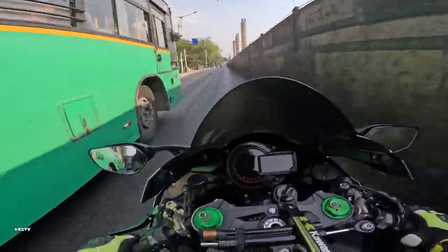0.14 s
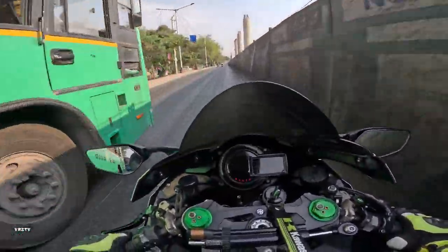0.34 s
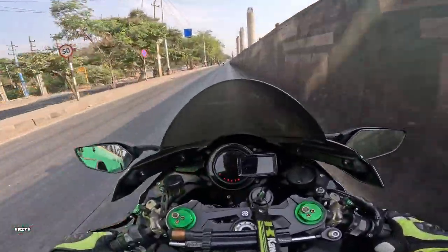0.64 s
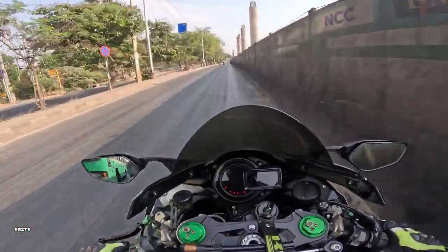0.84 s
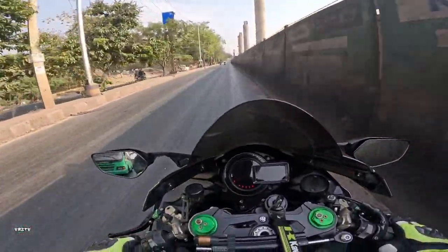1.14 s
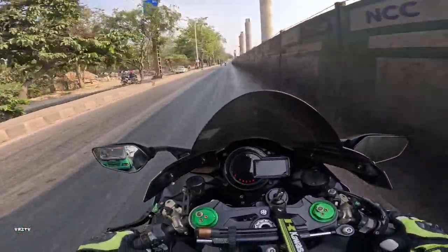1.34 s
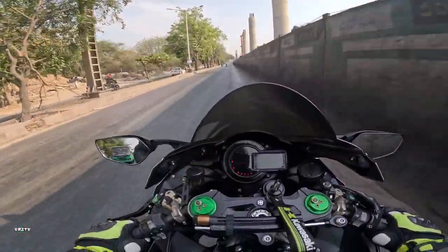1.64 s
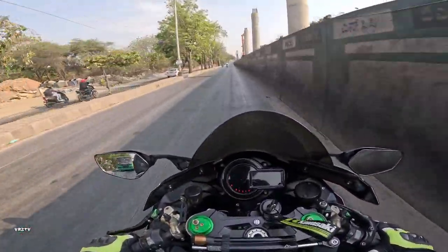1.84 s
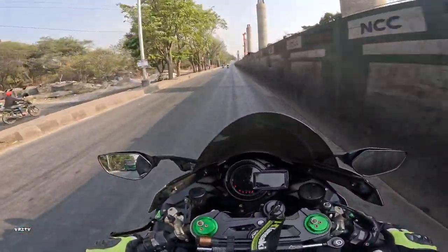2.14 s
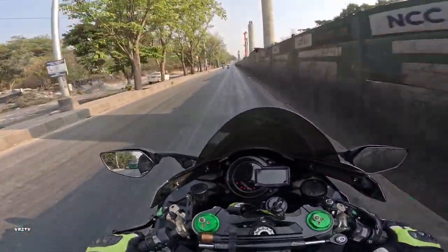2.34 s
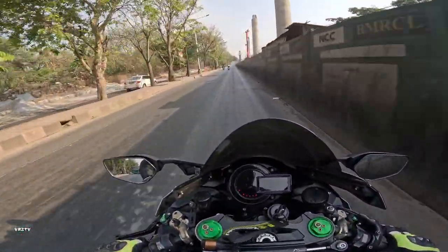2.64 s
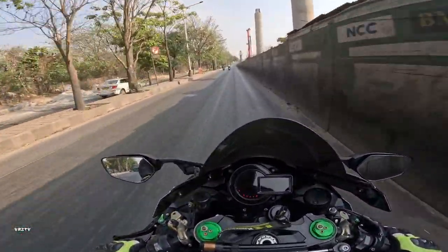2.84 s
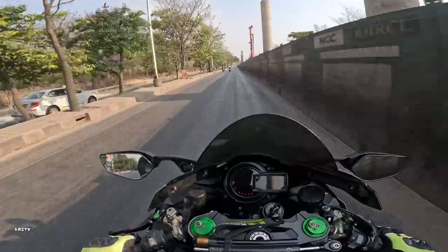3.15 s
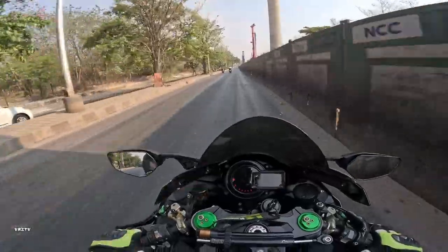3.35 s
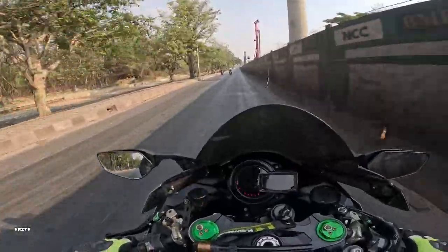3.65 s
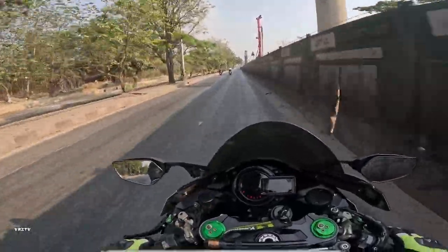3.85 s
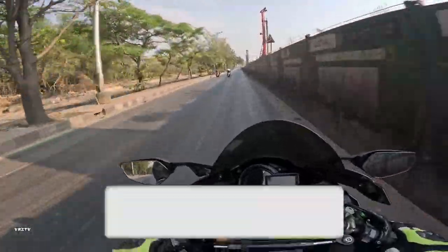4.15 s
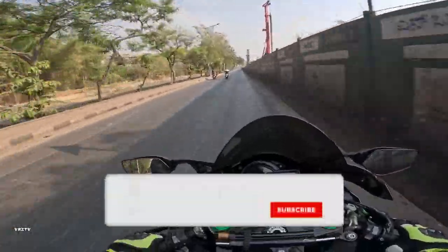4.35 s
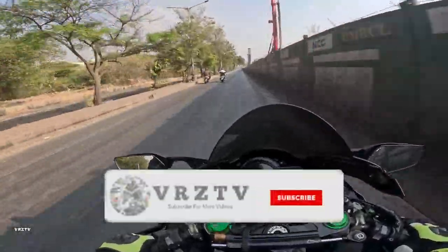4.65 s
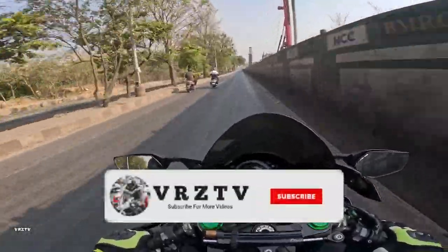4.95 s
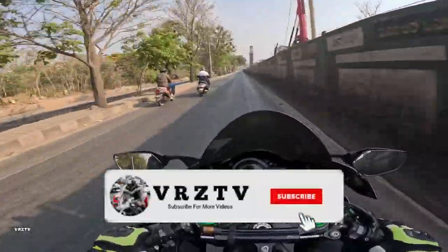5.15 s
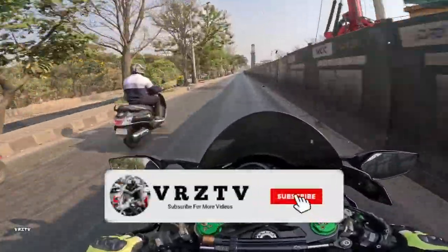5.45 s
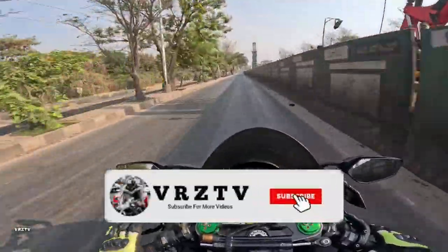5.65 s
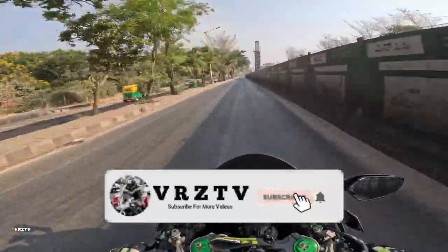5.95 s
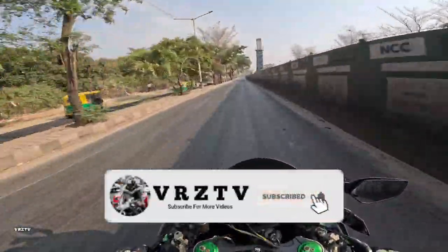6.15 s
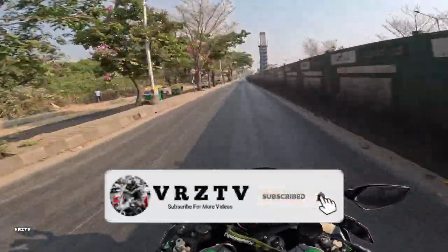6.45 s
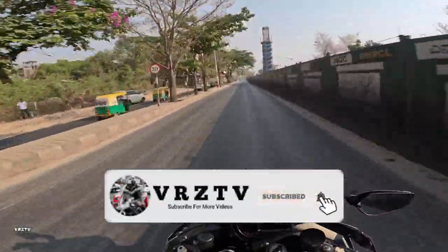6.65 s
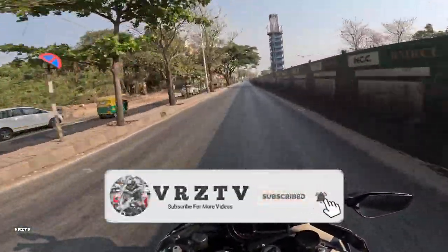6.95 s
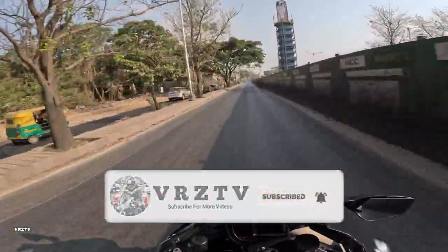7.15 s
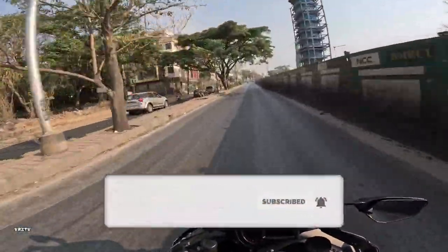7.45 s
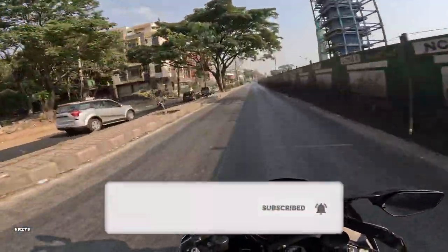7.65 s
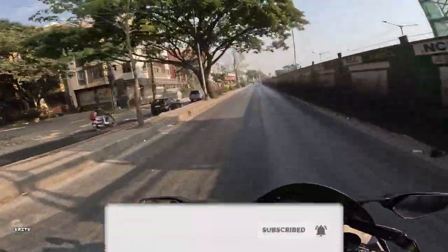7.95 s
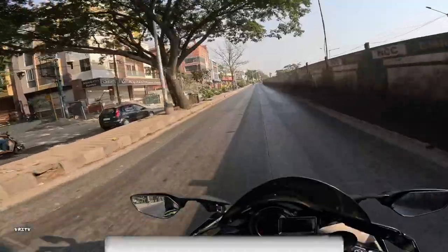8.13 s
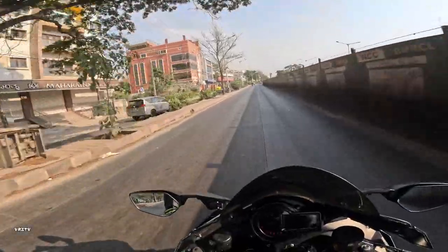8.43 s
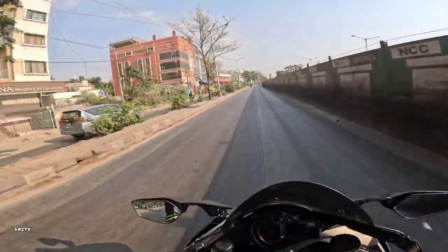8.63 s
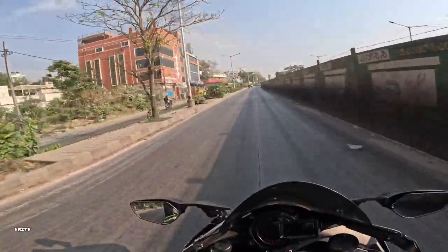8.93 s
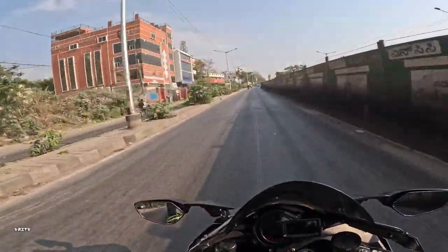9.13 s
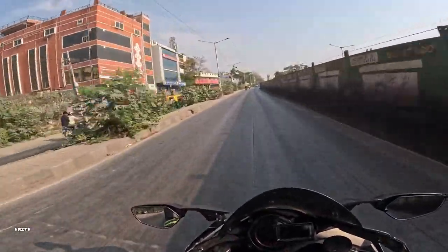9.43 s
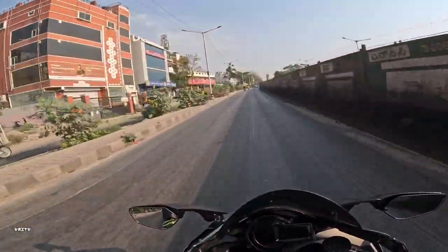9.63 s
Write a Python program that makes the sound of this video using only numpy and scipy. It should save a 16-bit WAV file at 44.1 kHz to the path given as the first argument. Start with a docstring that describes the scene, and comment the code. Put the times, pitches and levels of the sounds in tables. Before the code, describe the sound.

Close onboard sound of a powerful motorcycle on an open road along a hard wall. The engine rises through successive gears, swelling and hollowing with wall reflections, with raspy intake snarl and short exhaust pops at the shifts. A deep puff of bus wake passes early. Then the throttle shuts, leaving a soft falling hum beneath increasingly heavy wind roar and hiss.

```python
"""A climbing exhaust note is heard first: a four-cylinder sports motorcycle pulls hard, from the rider's seat.
The firing pulses sound as pipe multiples that swell and cancel against their echo off a wall.
Intake strokes ring the airbox into a snarl; three quick upshifts cut the firing and end in pops of unburnt fuel.
The fourth gear holds nearly level until the throttle closes, and the engine sinks to a drone of a few pipe lines.
Wind, as shaped noise, buffets and hisses at the microphone throughout."""
import sys
import numpy as np
from scipy import signal
from scipy.fft import rfft, irfft
from scipy.io import wavfile
from scipy.ndimage import uniform_filter1d, minimum_filter1d

SR = 44100
rng = np.random.default_rng(int(sys.argv[2]) if len(sys.argv) > 2 else 0)


def unload_wav(signal):
    """Save mono or channel-first audio to the path in sys.argv[1] as 16-bit WAV at rate SR, clipped to [-1, 1]."""
    wavfile.write(
        sys.argv[1],
        SR,
        np.round(np.clip(np.atleast_2d(signal).T, -1, 1) * 32767).astype(np.int16),
    )


N = 431738
TIME = np.arange(N) / SR
BINS = np.fft.rfftfreq(N, 1 / SR)

# Air at the microphone, before gusts: (time [s], buffeting level [dB], hiss level [dB])
WIND_LEVELS = [(0, -22, -58), (.45, -20, -50.5), (.8, -24, -57), (1.4, -23, -54), (2.2, -23.5, -54.5),
               (3.3, -19, -48.5), (3.7, -21, -58.5), (4.5, -19, -47), (5.5, -18, -50), (5.95, -16, -41),
               (6.9, -16, -37.5), (8.5, -16, -40), (9.79, -15, -38.5)]
# Spectrum of the buffeting: (frequency [Hz], level [dB])
BUFFET_SPECTRUM = [(15, -7.5), (45, -2.5), (120, 2.5), (220, 2.5), (400, -1), (560, -5.5), (850, -7),
                   (1350, -16.5), (2400, -20), (3300, -30), (5000, -39), (8000, -50), (15000, -58.5)]
# Spectrum of the wind hiss: (frequency [Hz], level [dB])
HISS_SPECTRUM = [(1500, -16), (3800, 3), (5300, 0.5), (6300, -4), (8200, -3.5), (9000, -8), (9800, -7),
                 (10800, -9), (11800, -9), (13000, -12), (15500, -17.5)]
# Thin whistles of the wind at edges: (frequency [Hz], width [Hz], lift of the hiss [dB])
EDGE_WHISTLES = [(5600, 250, 0), (6860, 200, 2), (7660, 200, 4)]
# Wake of a bus just overtaken, pushing on the microphone: (time [s], level [dB])
WAKE_LEVEL = [(0, -58), (.6, -49), (.8, -30), (1.3, -35), (1.5, -69)]
# Whine of the crank's drive gear, before flicker: (time [s], level [dB])
GEAR_LEVEL = [(0.1, -70), (.3, -57), (.75, -60), (.9, -80)]
# One pull in each gear, the speed being the firing rate at two firings a crank turn:
# (firing starts [s], firing stops [s], from [Hz], to [Hz], bow of the pull's course [Hz],
#  flare while the clutch bites [Hz], body of the exhaust [dB], intake [dB])
GEAR_PULLS = [(0, 1.725, 148.5, 249, 0, 0, 0, 0), (1.799, 3.393, 199, 252, 1, 17, -2, 0),
              (3.476, 5.254, 215, 250, 2, 4, -.5, .7), (5.337, 5.78, 223, 222, 0, 0, -7, 0)]
# Lumpy beat of unequal cylinders: (firing rate [Hz], level pulling [dB], level coasting [dB])
BEAT_LEVELS = [(153, -24, -21), (167.6, -20.5, -24.5), (179.7, -19.5, -27), (193.4, -38, -34.5),
               (215, -33, -31), (245, -35.5, -39)]
# Resonances that colour the beat: (frequency [Hz], level [dB])
LOPE_SPECTRUM = [(80, -5), (200, -13.5), (280, -21), (350, 3.5), (430, 6), (540, -16), (800, -3.5),
                 (1080, -9), (1400, -24.5)]
# Resonances of the airbox: (frequency [Hz], level [dB])
SNARL_SPECTRUM = [(600, -11), (850, 11), (1100, 5), (1280, -3.5), (1450, 4.5), (1750, 2.5), (2100, -2),
                  (2400, -3), (2850, -3.5), (3200, -18), (4200, -18.5), (6000, -27.5)]
# Spectrum of air rasping past the throttle: (frequency [Hz], level [dB])
RASP_SPECTRUM = [(150, -23), (400, -2.5), (620, 3), (830, 9.5), (1300, -12), (1800, 0), (2300, 0),
                 (2800, -0.5), (3200, -8), (4200, -14), (6500, -20), (9000, -21), (12300, -33),
                 (14000, -35), (15500, -37.5)]
# Nasal lift of the airbox's main resonance: (time [s], lift [dB])
HONK_LIFT = [(.5, -5), (1.6, -1.5), (3.95, -6.5), (4.35, 4.5), (4.75, 4), (5.2, -1), (5.7, -3)]
# Drone with the throttle closed:
# (firing rate [Hz], level of 1 [dB], 1.5 [dB] and 2 [dB] times that rate)
DRONE_LINES = [(164.6, -29, -22, -22.5), (175.8, -17, -25.5, -15.5), (187, -15.5, -27, -15.5),
               (189.4, -13, -21.5, -16.5), (200.5, -13, -30, -27), (208.3, -12.5, -23.5, -35),
               (213, -13, -27.5, -21), (218, -14, -29, -27.5)]
# Exhaust pops around the shifts: (time [s], level [dB])
EXHAUST_POPS = [(1.798, -6), (1.807, -7), (3.387, -6), (3.461, -1), (3.467, -6), (5.329, -1), (5.346, -9)]
# Pipe resonances favouring each multiple of the firing rate:
# (firing rate [Hz], level of the 1st [dB], 2nd [dB], 3rd [dB] and 4th multiple [dB])
PIPE_RESONANCES = [(155, -23.5, -18.5, -18, -34), (175, -14, -12.5, -34, -21),
                   (190, -12.5, -15.5, -30, -39.5), (207.6, -15.5, -15.5, -31.5, -23),
                   (229.2, -12.5, -10.5, -28, -24.5), (247.4, -15.5, -21.5, -24, -26)]
# The bike weaves beside a wall: (time [s], distance [m])
WALL_DISTANCE = [(0, 2.62), (.54, 2.23), (.72, 2.26), (1.06, 1.94), (1.71, 1.55), (2.19, 1.743),
                 (2.42, 1.66), (2.58, 1.755), (3.04, 1.65), (3.18, 1.76), (3.59, 1.82), (4.8, 1.61),
                 (5.21, 1.605), (5.44, 1.92), (5.56, 1.85), (5.7, 1.65)]

SOUND_M_PER_S, WALL_ECHO_GAIN = 343, 0.81
FLARE_S = .075
SAG_HZ_PER_S = 14.3
THROTTLE_CLOSE_S, DRONE_AFTER_S, DRONE_RISE_S = 0.15, 0.11, 0.054
FULL_BREATH_HZ = 245.5  # under throttle the intake stops growing at this firing rate
# Intake under throttle, before bite and gear: top level (dB), growth (dB per Hz), least level (dB)
SNARL_GROWTH, RASP_GROWTH = (-27, 0.45, -36.5), (-29, 0.51, -43.5)
SHUT_SNARL_DB, SHUT_RASP_DB, SHUT_DB_PER_HZ = -49, -30.5, 0.092  # levels at FULL_BREATH_HZ
BAND_LIMIT_HZ = 15750

PULL_TIMES = [s for pull in GEAR_PULLS for s in pull[:2]]
THROTTLE_SHUTS_S = GEAR_PULLS[-1][1]


def amp(db):
    """A level in decibels is the logarithm of an amplitude ratio."""
    return 10 ** (np.asarray(db) / 20)


def unit(x):
    """Normalization to a root-mean-square value of one."""
    return x / np.sqrt(np.mean(x ** 2) + 1e-20)


def curves(rows):
    """Linear interpolation of each column of a time table, one value for each sample."""
    s, *columns = np.transpose(rows)
    return [np.interp(TIME, s, column) for column in columns]


def spectrum_db(points, hz):
    """Interpolation of a spectrum in dB along a logarithmic frequency axis."""
    f, db = np.transpose(points)
    return np.interp(np.log(hz + 1), np.log(f), db)


def coloured(x, db):
    """Linear filtering multiplies each frequency bin by a gain in dB; the result has an rms of one."""
    return unit(irfft(rfft(x) * amp(db), N))


def wander(rate_hz):
    """Low-passed noise is a smooth random process; this one varies up to the given rate, with an rms of one."""
    count = 8192
    hz = np.fft.rfftfreq(count, N / SR / count)
    slow = irfft(rfft(rng.standard_normal(count)) / (1 + (hz / rate_hz) ** 4))
    return unit(np.interp(TIME, np.linspace(0, N / SR, count), slow))


def bell(hz, centre_hz, width_hz):
    """A resonance responds most, here by one, at its centre and less to either side."""
    return 1 / (1 + (2 * (hz - centre_hz) / width_hz) ** 2)


def wind(gust_db=1.0, eddy_db=0.57, hiss_gust_db=0.3, hiss_eddy_db=0.73,
         split_hz=200, roar_growth=0.57, full_db=-17):
    """Turbulence: eddies off the windscreen thump the microphone, and the hiss flutters with them."""
    buffet_db, hiss_db = curves(WIND_LEVELS)
    gusts, eddies = wander(22), wander(87)

    air = coloured(rng.standard_normal(N), spectrum_db(BUFFET_SPECTRUM, BINS))
    low_pass = signal.butter(2, split_hz, fs=SR, output="sos")
    rumble = signal.sosfiltfilt(low_pass, air)
    roar_gain = amp(roar_growth * (buffet_db - full_db))  # stronger wind is brighter
    buffet = rumble + (air - rumble) * roar_gain

    whistles_db = sum(db * bell(BINS, hz, width) for hz, width, db in EDGE_WHISTLES)
    hiss = coloured(rng.standard_normal(N), spectrum_db(HISS_SPECTRUM, BINS) + whistles_db)
    return (buffet * amp(buffet_db + gust_db * gusts + eddy_db * eddies)
            + hiss * amp(hiss_db + hiss_gust_db * gusts + hiss_eddy_db * eddies))


def wake(centre_hz=45, width_hz=55):
    """Large eddies turn over slowly, so their pressure on the microphone is a deep rumble."""
    rumble = coloured(rng.standard_normal(N), 20 * np.log10(bell(BINS, centre_hz, width_hz)))
    return amp(curves(WAKE_LEVEL)[0]) * rumble


def roadside(x, wall_s=0.0084, t60=0.16, wet_db=-17):
    """Diffuse reflection: the wall and things farther off scatter the engine back as a decaying tail."""
    t = TIME[:SR // 4]
    taps = rng.standard_normal(len(t)) * (t > wall_s) * amp(-60 * t / t60)
    high_pass = signal.butter(2, 600, "high", fs=SR, output="sos")
    scattered = signal.sosfilt(high_pass, x)
    return amp(wet_db) * signal.fftconvolve(scattered, taps / np.linalg.norm(taps))[:N]


def by_speed(rows, hz):
    """Linear interpolation of each column of a speed table at the engine's firing rate."""
    speeds, *columns = np.transpose(rows)
    return [np.interp(hz, speeds, column) for column in columns]


def per_gear(values):
    """A step function: one value for each pull, held while it lasts and ramped between pulls."""
    return np.interp(TIME, PULL_TIMES, np.repeat(values, 2))


def speed():
    """The firing rate climbs in the first three gears and holds nearly level in the fourth; then drag sinks it."""
    hz = np.interp(TIME, PULL_TIMES, [f for pull in GEAR_PULLS for f in pull[2:4]])  # shifts drop the rate
    for start, stop, _, _, bow_hz, flare_hz, *_ in GEAR_PULLS:
        progress = np.clip((TIME - start) / (stop - start), 0, 1)
        since = (TIME - start) / FLARE_S
        flare = np.clip(1 + since, 0, 1) * np.exp(-since ** 4)
        hz = hz + 4 * bow_hz * progress * (1 - progress) + flare_hz * flare
    return hz - SAG_HZ_PER_S * np.maximum(TIME - THROTTLE_SHUTS_S, 0)


def throttle():
    """A valve on the air supply: one while open, sinking to zero around the end of the last pull."""
    return np.clip((THROTTLE_SHUTS_S - TIME) / THROTTLE_CLOSE_S + .5, 0, 1)


def ignition(fade_s=0.0084):
    """Combustion gate: one while the cylinders fire, zero during each upshift."""
    cut = 0
    for before, after in zip(GEAR_PULLS, GEAR_PULLS[1:]):
        inside_s = np.minimum(TIME - before[1], after[0] - TIME)
        cut = cut + np.clip(inside_s / fade_s + .5, 0, 1)
    return 1 - cut


def gear(angle):
    """Tooth meshing: each turn of the crank gear gives one cycle of thin, unsteady whine for every tooth."""
    teeth, shake_rad, flicker_db = 49, 1.2, 4
    level = amp(curves(GEAR_LEVEL)[0] + flicker_db * wander(11))
    return level * np.sqrt(2) * np.cos(teeth * angle / 2 + shake_rad * wander(45))


def stack(angle, hz, multiples, colour, unrest, rate_hz, lift=lambda hz: 0, smear=0.1313):
    """Multiples of the firing rate sweep through fixed resonances that smear each pulse; rms one before lift."""
    sound, power = np.zeros(N), np.zeros(N)
    for k in multiples:
        gain = amp(spectrum_db(colour, k * hz))
        phase = k * angle - smear * k ** 2
        steady = np.cos(phase)
        restless = unrest * wander(rate_hz) * np.cos(phase + 2 * np.pi * rng.random())
        sound += gain * amp(lift(k * hz)) * (steady + restless)
        power += gain ** 2 * (1 + unrest ** 2) / 2
    return sound / np.sqrt(power)


def lope(angle, hz, cycle_db=-8):
    """Subharmonics: unequal cylinders repeat each turn and each four-stroke cycle, adding lines between."""
    per_turn = stack(angle, hz, np.arange(.5, 7), LOPE_SPECTRUM, unrest=.4, rate_hz=12)
    per_cycle = stack(angle, hz, np.arange(.75, 5, .5), LOPE_SPECTRUM, unrest=.7, rate_hz=12)
    pulling_db, coasting_db = by_speed(BEAT_LEVELS, hz)
    level_db = coasting_db + throttle() * (pulling_db - coasting_db)
    return amp(level_db) * (per_turn + amp(cycle_db) * per_cycle)


def intake_level(hz, growth, shut_db, bite_db=7, bite_s=0.055):
    """Air flow grows with speed under throttle, with a short extra bite as each new gear takes up the load."""
    top_db, db_per_hz, least_db = growth
    bite = 0
    for start, *_ in GEAR_PULLS[1:]:
        bite = bite + (TIME > start - FLARE_S) * np.exp(-((TIME - start) / bite_s) ** 2)
    grown = amp(top_db + db_per_hz * np.minimum(hz - FULL_BREATH_HZ, 0))
    gear_db = per_gear([pull[-1] for pull in GEAR_PULLS])
    pulling = np.hypot(grown, amp(least_db)) * amp(bite_db * bite + gear_db)
    coasting = amp(shut_db + SHUT_DB_PER_HZ * (hz - FULL_BREATH_HZ))
    return coasting + throttle() * (pulling - coasting)


def intake(angle, hz, gulp=0.35, honk_hz=1700, honk_width_hz=550):
    """Forced resonance: each intake stroke rings the airbox and drags a puff of rasping air past the throttle."""
    honk_db, = curves(HONK_LIFT)
    uneven, jitter_rad = .16, .03

    def honk(f):
        """The airbox's main resonance lifts or lowers the multiples that pass near it."""
        return honk_db * bell(f, honk_hz, honk_width_hz)

    strokes = angle + jitter_rad * wander(25)  # uneven timing thickens the highest lines most
    snarl = stack(strokes, hz, np.arange(5, 27), SNARL_SPECTRUM, unrest=.25, rate_hz=10, lift=honk)
    snarl *= 1 + uneven * (np.cos(angle / 2) + np.sin(angle / 4))  # the four cylinders draw unequally

    puffs = rng.standard_normal(N) * np.exp(gulp * np.cos(angle) + uneven * np.cos(angle / 2))
    rasp = coloured(puffs, spectrum_db(RASP_SPECTRUM, BINS))
    return (intake_level(hz, SNARL_GROWTH, SHUT_SNARL_DB) * snarl
            + intake_level(hz, RASP_GROWTH, SHUT_RASP_DB) * rasp)


def pops(pipe_hz=260):
    """Explosive excitation: unburnt fuel goes off in the pipe, a short heavy swing with a dull crack on top."""
    ring_s, crack, dull_hz = .0018, .3, 2200
    out, t = np.zeros(N), TIME[:SR // 20]
    dulling_db = 10 * np.log10(1 + (BINS / dull_hz) ** 2)
    grit = coloured(rng.standard_normal(N), spectrum_db(RASP_SPECTRUM, BINS) - dulling_db)
    swell = t / ring_s * np.exp(1 - t / ring_s)
    for s, db in EXHAUST_POPS:
        at = round(s * SR) + np.arange(len(t))
        out[at] += amp(db) * swell * (np.sin(2 * np.pi * pipe_hz * t) + crack * grit[at])
    return out


def pipe_delay(k, lag=1.76):
    """Dispersion: higher multiples trail the first (radians), so each pulse leaves as a falling swing."""
    return lag * np.sqrt(k - 1)


def pipe_lines(angle, multiples, levels_db, flutter=0.036, ripple_db=0.5248):
    """Harmonic synthesis: the clean low lines of the pipe, with strengths that vary a little."""
    lines = 0
    for k, db in zip(multiples, levels_db):
        lines = lines + amp(db + ripple_db * k * wander(16)) * np.cos(k * angle - pipe_delay(k))
    return np.sqrt(2) * lines * (1 + flutter * wander(49))


def drone(angle, hz):
    """Pipe resonance off load: just after the throttle closes, a few lines settle into a low hum."""
    onset = np.clip((TIME - THROTTLE_SHUTS_S - DRONE_AFTER_S) / DRONE_RISE_S, 0, 1)
    return onset * pipe_lines(angle, [1, 1.5, 2], by_speed(DRONE_LINES, hz))


def exhaust(angle, hz, wall_dull_hz=730):
    """Interference: the note meets its duller echo off the wall, so its multiples swell and cancel in turn."""
    first, second, third, fourth = by_speed(PIPE_RESONANCES, hz)
    body_db = per_gear([pull[-2] for pull in GEAR_PULLS])  # less throttle thins the two lowest multiples
    note = pipe_lines(angle, [1, 2, 3, 4], [first + body_db, second + body_db, third, fourth])
    round_trip_s = 2 * curves(WALL_DISTANCE)[0] / SOUND_M_PER_S
    echo = np.interp(TIME - round_trip_s, TIME, note)
    dull_echo = irfft(rfft(echo) / (1 + (BINS / wall_dull_hz) ** 8), N)
    return (note + WALL_ECHO_GAIN * dull_echo) * throttle()


def scene(coast_through=0.073):
    """Phase locking: one crank drives the engine's voices, and bumps in the road shake its speed slightly."""
    hz, firing = speed(), ignition()
    angle = 2 * np.pi * np.cumsum(hz) / SR + .13 * wander(13)  # firing phase (radians)
    fired = (exhaust(angle, hz) + drone(angle, hz)) * firing + pops()
    drawn = intake(angle, hz) * (firing + coast_through * (1 - firing))
    engine = fired + drawn + lope(angle, hz) + gear(angle)  # the pistons go on pumping through the shifts
    return (engine + roadside(engine) + wind() + wake())[None]


def record(dry):
    """Gain reduction around each peak, as in a fast limiter, and then a low-pass band limit."""
    ceiling, size = .89, 221  # amplitude, samples
    gain = minimum_filter1d(ceiling / np.maximum(abs(dry), ceiling), 2 * size)
    smooth_gain = uniform_filter1d(uniform_filter1d(gain, size), size)
    low_pass = signal.firwin(1023, BAND_LIMIT_HZ, window=("kaiser", 9), fs=SR)
    return signal.oaconvolve(dry * smooth_gain, low_pass[None], "same")


dry = scene()
out = record(dry)
unload_wav(out)
```